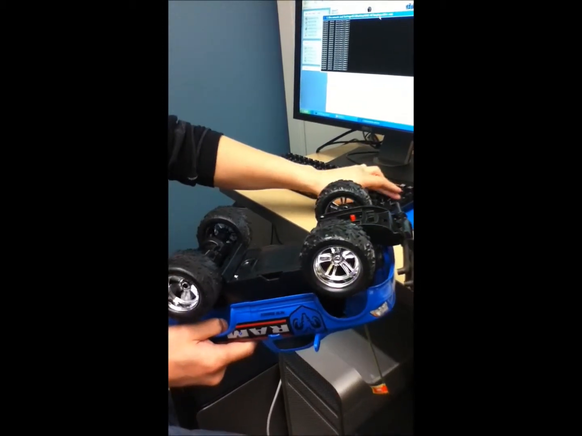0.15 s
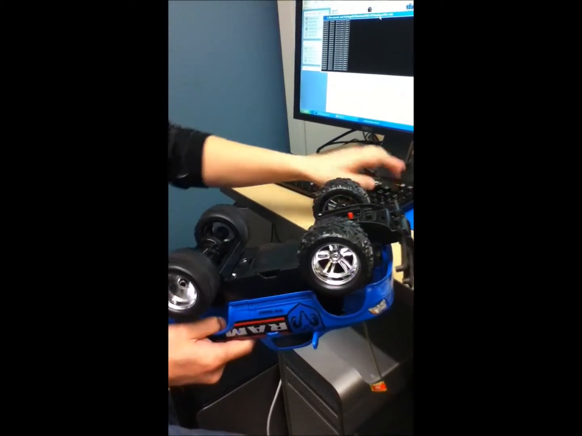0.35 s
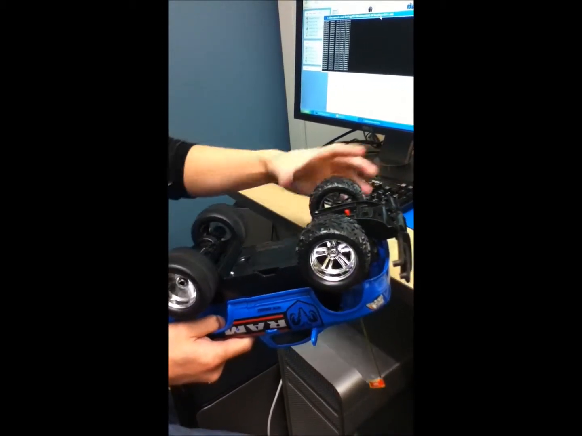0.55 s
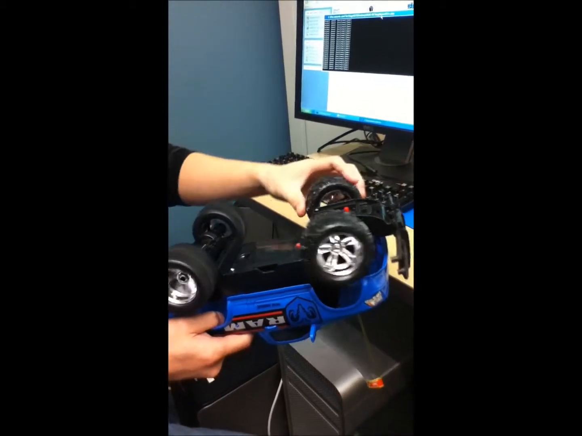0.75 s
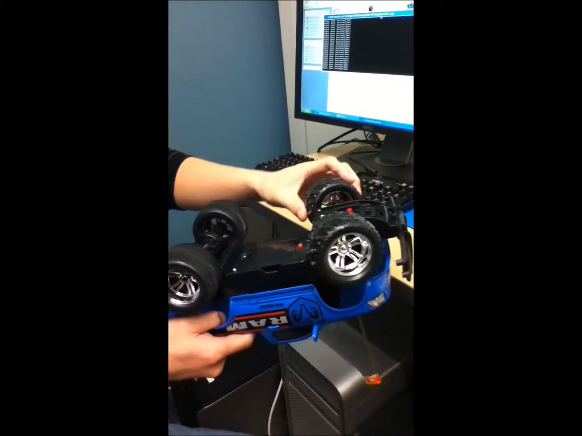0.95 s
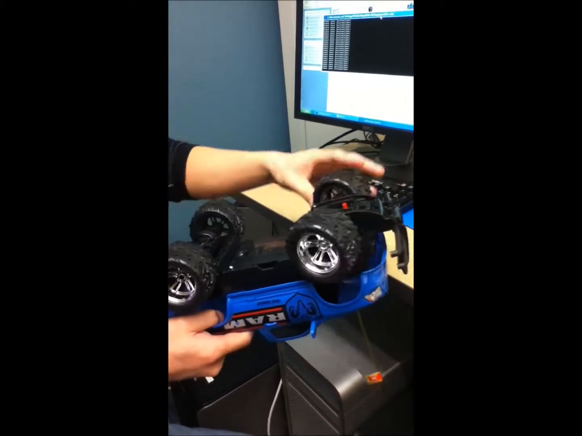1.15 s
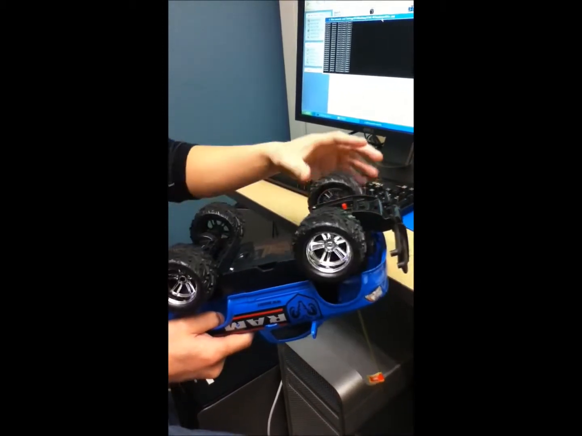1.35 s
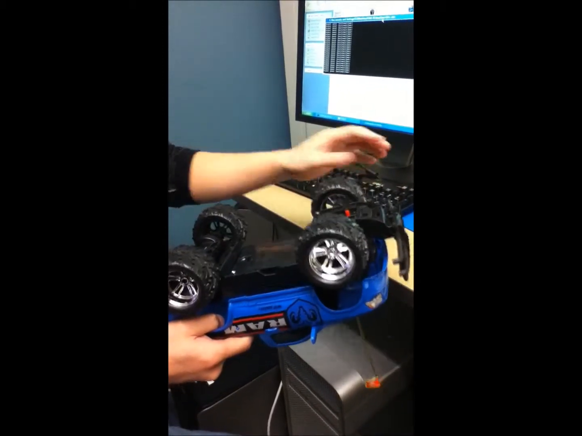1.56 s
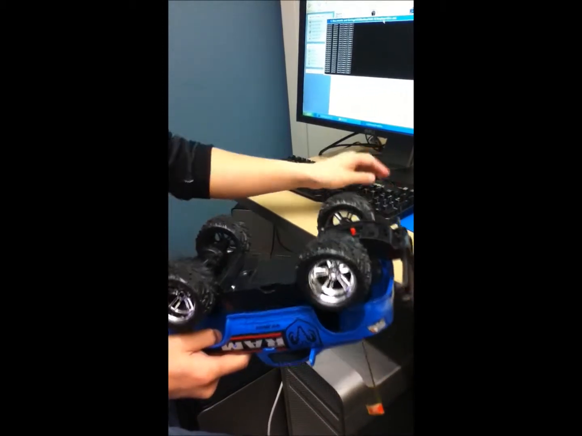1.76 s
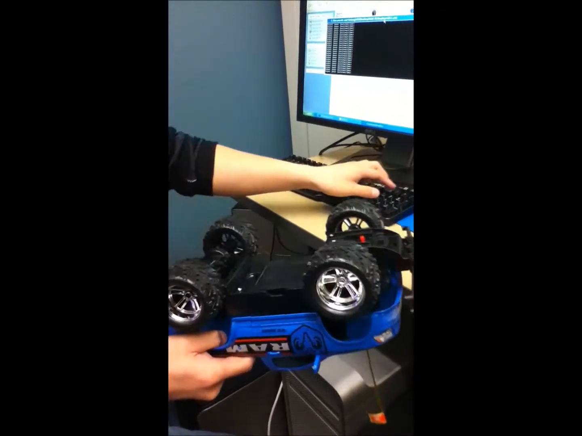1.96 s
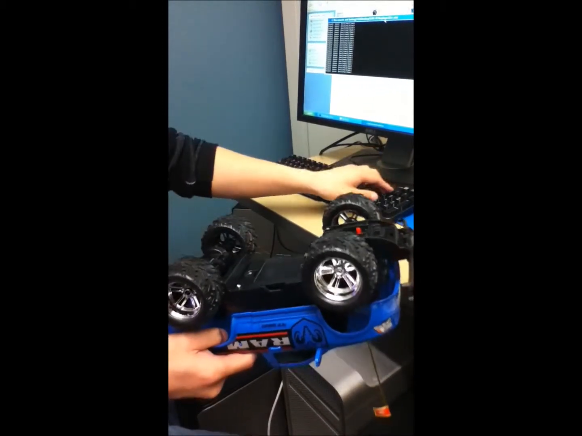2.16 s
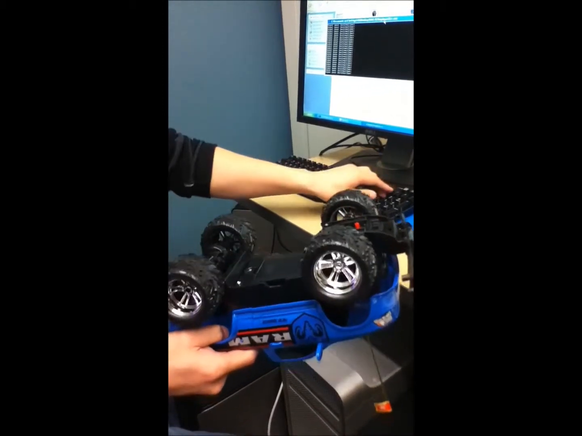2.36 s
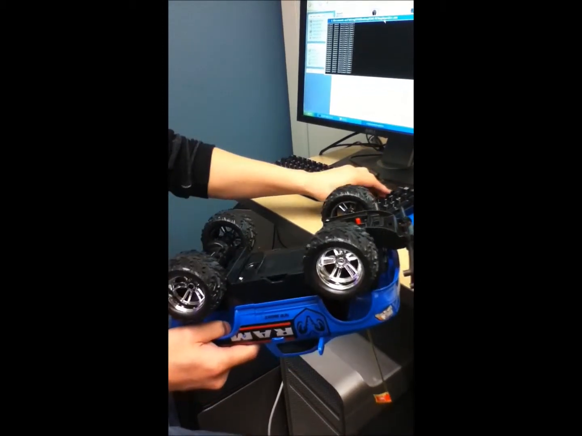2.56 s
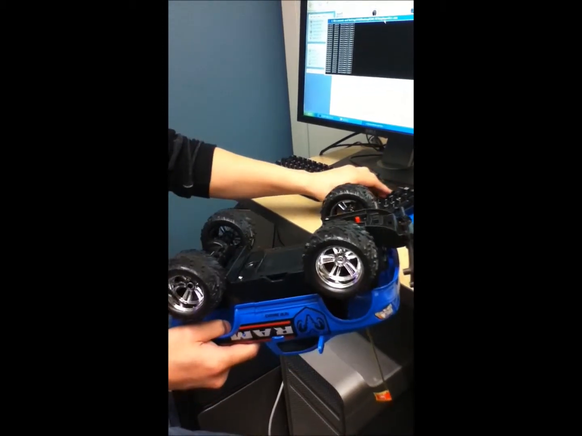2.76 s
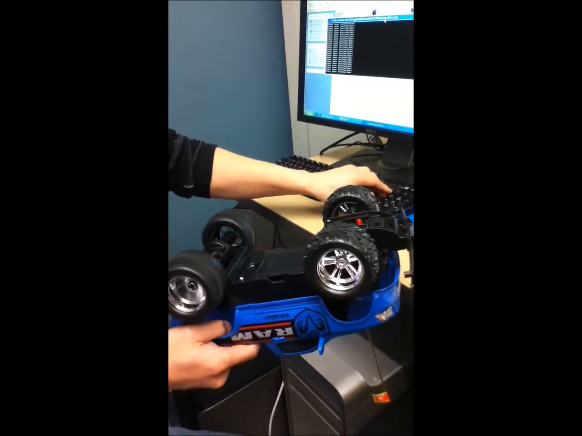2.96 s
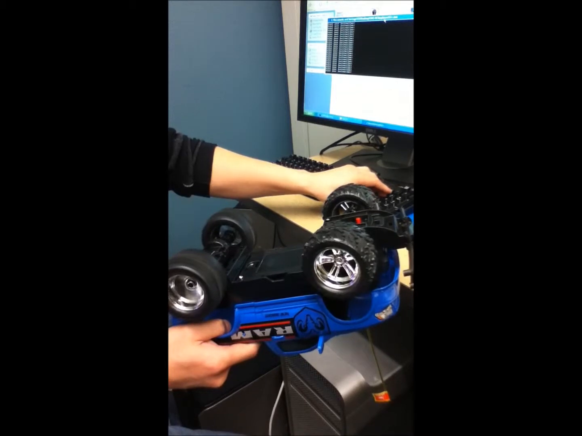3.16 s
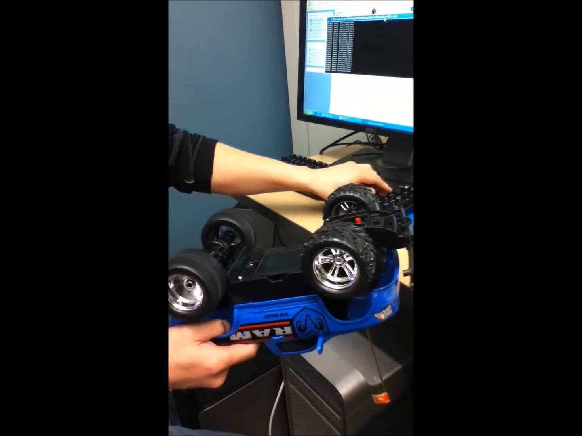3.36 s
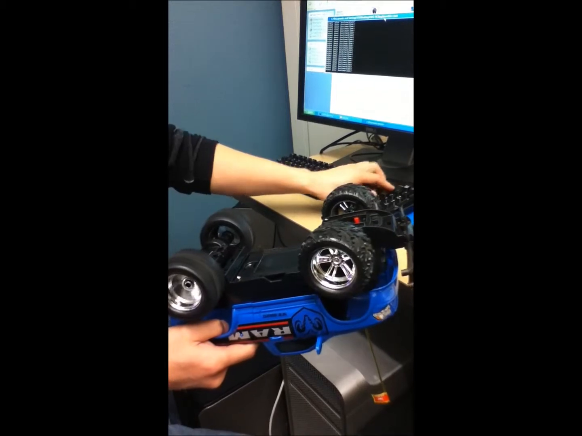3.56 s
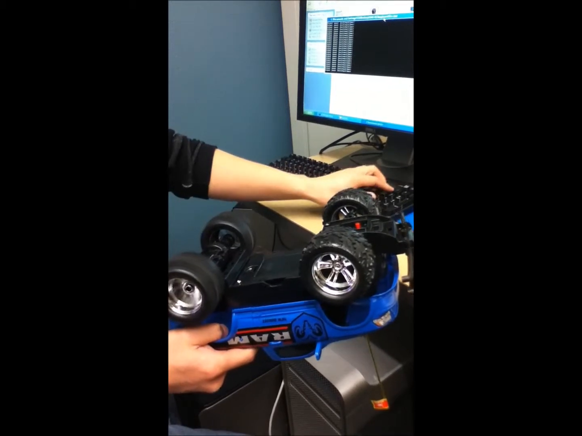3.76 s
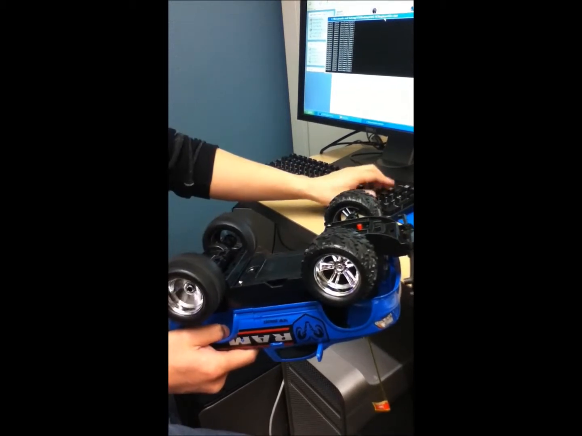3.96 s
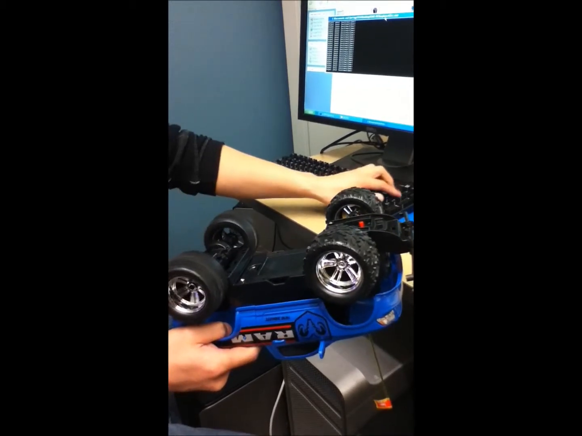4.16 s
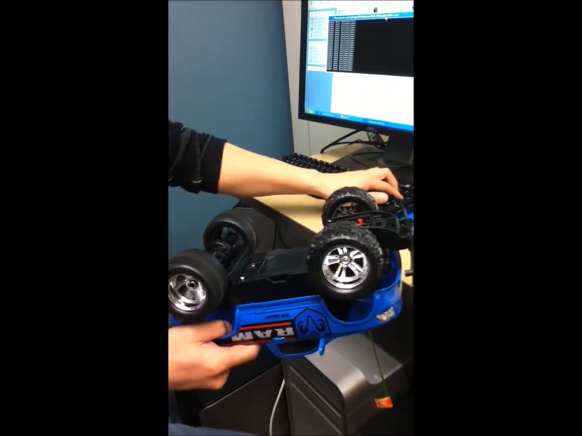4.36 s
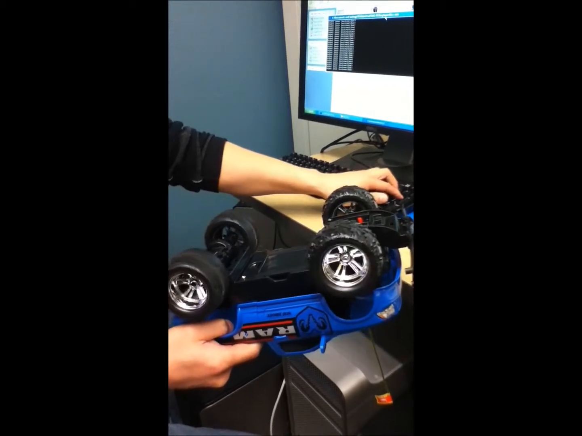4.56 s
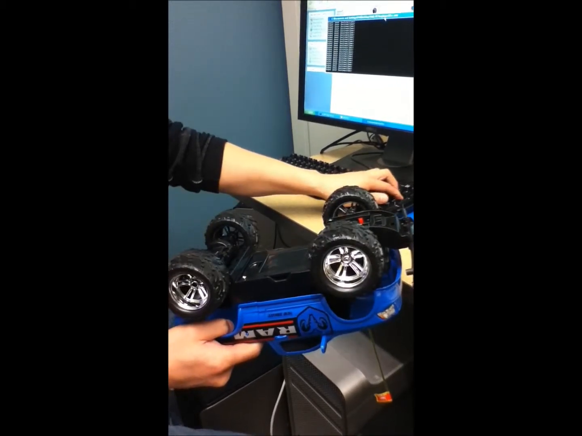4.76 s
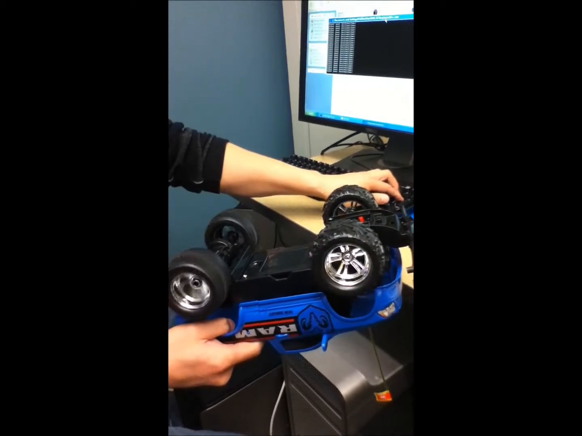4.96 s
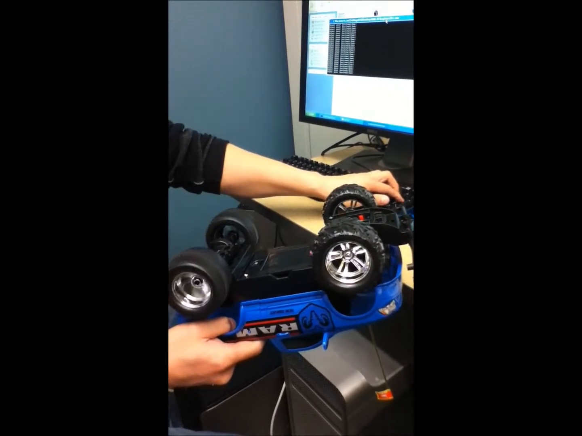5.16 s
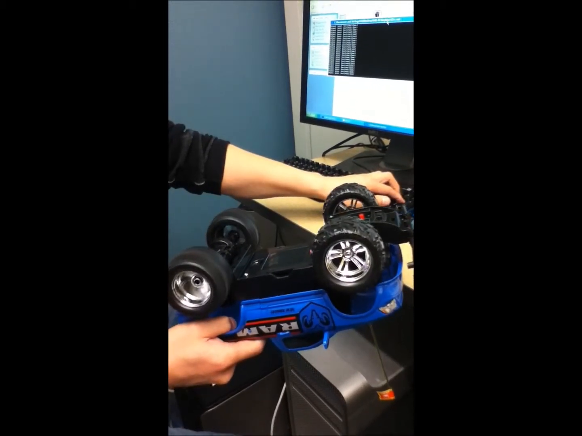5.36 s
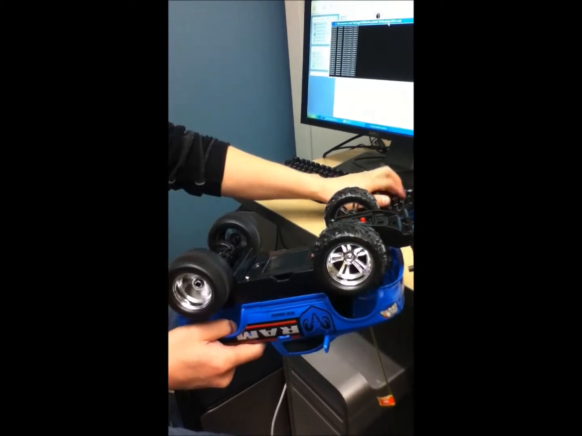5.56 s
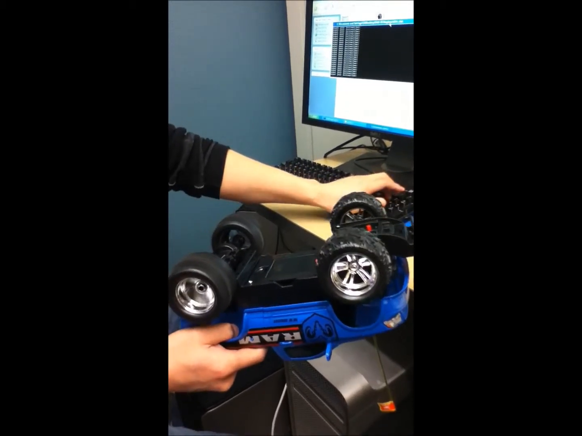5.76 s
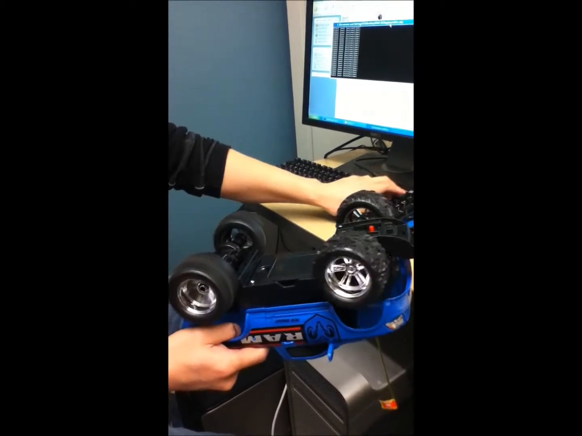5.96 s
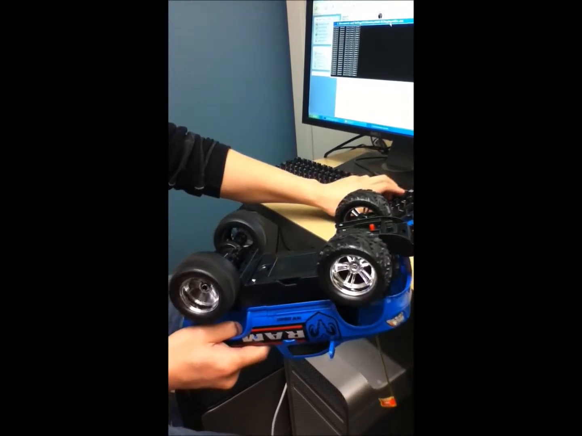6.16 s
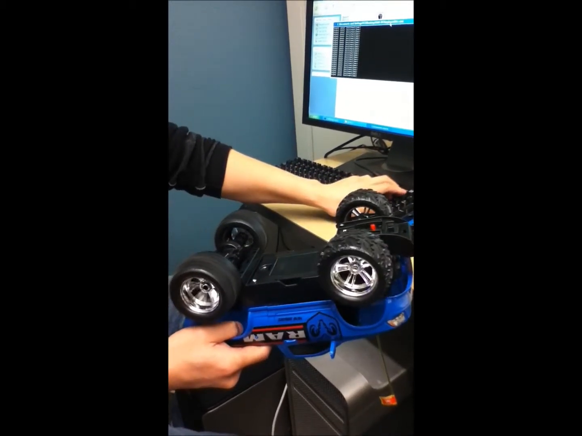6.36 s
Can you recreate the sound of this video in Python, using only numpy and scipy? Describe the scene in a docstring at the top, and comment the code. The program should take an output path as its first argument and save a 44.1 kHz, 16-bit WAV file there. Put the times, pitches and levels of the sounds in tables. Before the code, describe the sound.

Over low computer fan hum in a small room, a toy truck's electric motor is blipped six times close to the microphone. Each start clicks, then plastic gears chatter brightly with pulsing wheel knocks. Two bursts last about a second, others are brief; releases bring knocks and slowing ticks.

```python
"""A low room hum with a computer fan is heard first; then the electric motor of a toy truck, held upside down,
is blipped six times and left to coast. Each start takes up the gear slack with a click.
Plastic teeth chatter as trains of impulses, and loose axles modulate the chatter as the free wheels turn.
Motor bands growl, hum and whirr at multiples of the shaft rate; noise bursts make the knocks and taps.
The gears and clicks excite the resonances of the plastic chassis, and a short reverberation follows."""
import sys
import numpy as np
from scipy import signal
from scipy.fft import rfft, irfft
from scipy.io import wavfile
from scipy.ndimage import uniform_filter1d

SR = 44100
rng = np.random.default_rng(int(sys.argv[2]) if len(sys.argv) > 2 else 0)


def waveform_to_disk(signal):
    """Save audio, clipped to [-1, 1], as 16-bit WAV at the path in sys.argv[1]."""
    frames = np.transpose(np.atleast_2d(signal))
    scaled = np.clip(frames, -1, 1) * 32767
    samples = np.round(scaled).astype(np.int16)
    wavfile.write(sys.argv[1], SR, samples)


N = 286650
T = np.arange(N) / SR

# presses of the throttle: (start [s], held [s], coasting [s], top speed [Hz], relative level [dB],
# axle position [knocks], coasting knock rate [Hz], relative slack click level [dB], its relative treble [dB])
THROTTLE_PRESSES = [(0.242, 0.37, .6, 429.4, 0, 0.068, 18.6, -22, -22),
                    (2.359, .036, .065, 440.5, -0.5, 0.39, 37, -17.5, -10.5),
                    (2.859, 0.99, .52, 446.5, -0.5, 0.31, 23.2, -19, -14),
                    (4.377, 0.069, .32, 439.2, -1.5, 0.85, 20, -19, -13),
                    (4.932, .944, .7, 451.6, 0, 0.888, 21, -23, -30),
                    (6.453, 0.27, 0.63, 446, -2.5, 0.7, 15.2, -15, -14.5)]
# broad colour of the plastic chassis: (frequency [Hz], relative level [dB])
CHASSIS_COLOUR = [(250.0, -22), (500.0, -16.5), (700.0, -5), (1500.0, -7.5), (1750.0, -2), (2600.0, -0.5),
                  (4500.0, -6.5), (7000.0, -3), (10000.0, -6.5), (12000.0, -6.5), (13500.0, -17),
                  (15500.0, -21.5)]
# chassis resonances: (frequency [Hz], width [Hz], lift [dB])
CHASSIS_MODES = [(819, 30, 8), (936, 14, 4.5), (1214, 188, 10), (1451, 45, 5.5), (1697, 110, 6),
                 (1865, 284, 8), (2193, 187, 8.5), (2317, 103, 8), (2740, 400, 2.5), (2950, 595, 8),
                 (3430, 240, 4.5), (3812, 347, 9.5), (4250, 186, 1.5), (4407, 790, 10.5), (4870, 600, 1.5),
                 (5220, 720, 5), (5580, 150, 2.5), (6050, 230, 9.5), (6470, 310, 5.5), (7620, 340, 3.5),
                 (8830, 75, 3), (9480, 330, 5.5)]


def undb(db):
    """Amplitude gain is ten to the power of a twentieth of the level in decibels."""
    return 10 ** (np.asarray(db) / 20)


def unit(x):
    """Normalization: dividing by the root mean square gives unit power."""
    return x / np.sqrt(np.mean(x ** 2))


def walk(rate):
    """Band-limited random modulation: held random steps, smoothed, with a spread near 1."""
    step = max(int(SR / rate), 1)
    held = rng.standard_normal(N)[np.arange(N) // step]
    return unit(uniform_filter1d(held, step))


def colour(x, points, modes=()):
    """Minimum-phase filtering by a broad spectrum and resonant peaks; keeps the power of white noise."""
    hz = np.maximum(np.fft.rfftfreq(4096, 1 / SR), 1)
    points = np.array(points)
    db = np.interp(np.log(hz), np.log(points[:, 0]), points[:, 1])
    for centre, width, lift_db in modes:
        db = db + lift_db / (1 + (2 * (hz - centre) / width) ** 2)
    # folding the cepstrum onto positive times makes the response causal
    cepstrum = irfft(np.log(undb(db)))
    half = len(cepstrum) // 2
    cepstrum[1:half] *= 2
    cepstrum[half + 1:] = 0
    response = irfft(np.exp(rfft(cepstrum)))
    return signal.fftconvolve(x, response / np.linalg.norm(response))[:len(x)]


def split(x, hz):
    """Complementary filtering: the parts below and above a frequency sum to the whole."""
    low = signal.sosfiltfilt(signal.butter(2, hz, fs=SR, output="sos"), x)
    return low, x - low


def throttle():
    """Motor kinematics: speed rises toward its top while a press is held, then friction slows it evenly."""
    # the motor leaps to a share of its top speed, then closes in on the rest
    kick_s, kick_share, spin_up_s = .035, .511, .25
    # gear noise at top speed, its growth with speed, and the extra while the teeth pull hard
    drive_db, drive_db_per_octave, strain_db = -18.5, 7.5, 9.5
    strain_rise_s, strain_fade_s, release_s = 0.1, 0.24, 0.027
    # the treble grows with speed and strain, and is dull just after a start
    base_treble_db, treble_db_per_octave, strain_treble_db = 4, 4, 5.5
    dull_db, dull_s = -15.5, 0.06
    # driven axles knock once in so many motor turns, and stray from step the longer they spin
    turns_per_knock, stray_knocks_per_s = 12.04, 0.13
    # depth of the knocks: driven, extra after a start, coasting
    driven_flail_db, overshoot_db, coast_flail_db = 11.5, 11.5, 7
    # the knocks build up, and the first violent flailing settles
    flail_rise_s, flail_settle_s = 0.28, 0.14

    presses = np.array(THROTTLE_PRESSES)
    latest = np.maximum(np.searchsorted(presses[:, 0], T, side="right") - 1, 0)
    start, held, coasting, top_hz, press_db, axle, rock_hz, *_ = presses[latest].T
    age = np.maximum(T - start, 0)
    driven = np.minimum(age, held)
    released = np.maximum(age - held, 0)

    speed = np.minimum(driven / kick_s, 1) * (1 - (1 - kick_share) * np.exp(-driven / spin_up_s))
    speed = speed * np.maximum(1 - released / coasting, 0)
    octaves = np.log2(np.maximum(speed, 1e-6))  # relative to top speed
    power = np.maximum(1 - released / release_s, 0)
    strain = power * np.minimum(age / strain_rise_s, 1) * np.exp(-(age / strain_fade_s) ** 2)

    knocks = np.cumsum(top_hz * speed) / SR / turns_per_knock
    knocks = axle + knocks - np.interp(start, T, knocks) + stray_knocks_per_s * age * walk(14)
    extra_db = overshoot_db * np.exp(-age / flail_settle_s)
    flail_db = coast_flail_db + power * (driven_flail_db - coast_flail_db + extra_db)
    treble_db = base_treble_db + treble_db_per_octave * octaves + strain_treble_db * strain
    return dict(
        shaft_hz=top_hz * speed,
        coasting=(released > 0) & (speed > 0),
        level_db=drive_db + press_db + drive_db_per_octave * octaves + strain_db * strain,
        treble_db=treble_db + dull_db * np.exp(-age / dull_s),
        # once released, the axles rock at their own pace
        knocks=np.where(released > 0, released * rock_hz, knocks),
        flail_db=flail_db * np.minimum(age / flail_rise_s, 1))


def drivetrain(motor, flutter=.006, low_surge=0.61):
    """Source and resonator: gear and motor forces, louder and brighter when driven harder, ring the chassis."""
    shaft_hz = motor["shaft_hz"]
    turns = np.cumsum(shaft_hz * (1 + flutter * walk(60))) / SR
    level, bright = undb(motor["level_db"]), undb(motor["treble_db"])
    rest, high = split(gears(shaft_hz, turns) + whine(shaft_hz, turns), 2770)
    low, middle = split(rest, 1720)
    load = axle_load(motor["knocks"], motor["flail_db"])
    # hard knocks swell the upper range most; the low range runs on more evenly
    upper_force = shifting_contact((middle + bright * high) * load)
    low_force = (low + whirr(shaft_hz, turns)) * load ** low_surge
    force = (upper_force + low_force) * uniform_filter1d(level, SR // 200)
    return chassis(force) + shaft_hum(shaft_hz, turns)


def gears(shaft_hz, turns, count=12, size=48, scatter_db=3.0, tooth_db=1.0, rub_db=0,
          ring_s=0.0018, backlash_s=.00005, even_hz=380):
    """Gear meshing: a `count`-tooth pinion strikes a `size`-tooth spur gear; flanks scrape between the blows."""
    tooth = np.floor(turns * count).astype(int)
    hits = np.flatnonzero(np.diff(tooth))
    # each spur tooth has its own fit, and lands on its leading or trailing flank
    fit, flank = rng.standard_normal((size, 2))[tooth[hits] % size].T
    force, late = rng.standard_normal((N // 10, 2))[:len(hits)].T
    # slow gears catch and tick less evenly
    force = force * (2 - np.minimum(shaft_hz[hits] / even_hz, 1))
    # backlash lets a tooth land early or late, which blurs the high orders
    at = np.clip(hits + np.round(backlash_s * SR * late).astype(int), 0, N - 1)
    strength = undb(scatter_db * force + tooth_db * fit)
    blows = np.zeros(N)
    blows[at] = np.sign(flank) * strength / np.sqrt(shaft_hz[hits] + 20)
    blows /= np.sqrt(np.mean(blows[shaft_hz > 20] ** 2))
    fade = np.exp(-1 / (ring_s * SR))
    contact = signal.lfilter([1 - fade], [1, -fade], blows ** 2)
    scrape = np.sqrt(contact) * rng.standard_normal(N)
    return (blows + undb(rub_db) * scrape) / np.sqrt(1 + undb(rub_db) ** 2)


def rough_band(order, turns, rasp_hz):
    """Random modulation broadens one multiple of the shaft rate into a narrow band of noise."""
    envelope = walk(rasp_hz) + 1j * walk(rasp_hz)
    return np.real(envelope * np.exp(2j * np.pi * order * turns))


def whine(shaft_hz, turns, free_hz=400, slip_hz=110, whine_db=-13.0, rasp_hz=70):
    """Order excitation: the motor and spur gear growl in rough, rising bands while pulling up to speed."""
    # growl under load: (multiple of the shaft rate, relative level [dB])
    growl_orders = [(2, -4), (2.5, -9.5), (5.75, 0.5), (6.75, -2.5), (8.75, -4)]
    speeding_up = (np.gradient(shaft_hz) > 0) & (shaft_hz > free_hz / 2)
    pulling = uniform_filter1d(1. * speeding_up, SR // 40)
    # a DC motor's torque falls as it nears its free speed
    torque = pulling * np.clip((free_hz - shaft_hz) / slip_hz, 0, 1)
    tone = sum(undb(db) * rough_band(order, turns, rasp_hz) for order, db in growl_orders)
    return undb(whine_db) * torque * tone


def whirr(shaft_hz, turns, order=3, full_hz=430, whirr_db=-18, rasp_hz=330):
    """Pole-passing excitation: the three-pole rotor adds a broad, rough whirr that grows with speed squared."""
    return undb(whirr_db) * (shaft_hz / full_hz) ** 2 * rough_band(order, turns, rasp_hz)


def axle_load(knocks, flail_db, sharp=2.4, scatter=0.17):
    """Amplitude modulation: chatter surges at each axle knock, more deeply the harder the axles flail."""
    # no two neighbouring knocks are equally hard
    strength = 1 + scatter * rng.standard_normal(100)[np.round(knocks).astype(int) % 100]
    surge = np.abs(np.cos(np.pi * knocks)) ** (2 * sharp)
    swell = undb(flail_db * strength * surge)
    # the knocks bunch the power up without adding to it
    local_power = uniform_filter1d(uniform_filter1d(swell ** 2, SR // 10), SR // 15)
    return swell / np.sqrt(local_power)


def shifting_contact(force, rate=33, path_s=.0012, share=0.34):
    """Comb filtering: the contact point jumps, so a second path into the shell recolours the rattle."""
    spot = (T * rate).astype(int)
    lag = 4 + (path_s * SR * rng.random(N)[spot]).astype(int)
    flank = np.sign(rng.standard_normal(N))[spot]
    second_path = share * flank * force[np.maximum(np.arange(N) - lag, 0)]
    return (force + second_path) / np.sqrt(1 + share ** 2)


def chassis(force):
    """Modal resonance: a force on the gearbox rings the plastic shell."""
    return colour(force, CHASSIS_COLOUR, CHASSIS_MODES)


def shaft_hum(shaft_hz, turns, mode_hz=436, width_hz=32, hum_db=-43):
    """Forced resonance: the unbalanced rotor hums when its speed meets a resonance of the frame."""
    response = 1 / (1 + (2 * (shaft_hz - mode_hz) / width_hz) ** 2)
    return undb(hum_db + 2.8 * walk(25)) * response * np.sin(2 * np.pi * turns)


def contacts(table, rise_s, decay_s, gain_db, treble_db):
    """Transient excitation: each click is a noise burst, a quick cluster of small contacts that dies away."""
    force = np.zeros(N + SR)
    t = T[:SR // 20]
    shape = (1 - np.exp(-t / rise_s)) * np.exp(-t / decay_s)
    shape = shape / shape.max()
    for s, db, bright_db in table:
        low, high = split(rng.standard_normal(len(t)), 6600)
        i = int(s * SR)
        burst = low + undb(bright_db + treble_db) * high
        force[i:i + len(t)] += undb(db + gain_db) * shape * burst
    return force[:N]


def coasting_ticks(motor, count=150, slow_hz=230, above_db=7, scatter_db=1.5, treble_db=-10):
    """Random impacts: slack teeth tick as the wheels slow; rows (time [s], relative level [dB], treble [dB])."""
    at = ((np.arange(count) + rng.random(count)) * (N - 1) / count).astype(int)
    peak_db = motor["level_db"][at] + above_db + scatter_db * rng.standard_normal(count)
    loose = motor["coasting"][at] & (motor["shaft_hz"][at] < slow_hz)
    return [(s, db, treble_db) for s, db in zip(T[at[loose]], peak_db[loose])]


def drive_clicks(motor):
    """Impact excitation: gear slack, hard knocks and coasting ticks ring the shell and the gear teeth."""
    # hard knocks in the drive: (time [s], relative level [dB], relative treble [dB])
    hard_knocks = [(0.849, -15, 1), (1.016, -23, -12), (1.051, -33, -16), (2.37, -23, -10),
                   (2.418, -36, -8), (3.482, -5, -16), (3.561, -7, -6), (4.194, -19, -2), (4.397, -9.5, -5),
                   (4.44, -6.5, -28), (4.474, -7.5, -12), (4.546, -16.5, -10), (5.919, -0.5, -30),
                   (5.95, -5.5, -2)]
    # extra ring of the gear teeth: (frequency [Hz], width [Hz], lift [dB])
    tooth_modes = [(5040, 4300, 7.5), (7250, 1100, 2.5)]
    slack = [(start, click_db, treble_db) for start, *_, click_db, treble_db in THROTTLE_PRESSES]
    snaps = contacts(slack, rise_s=0.003, decay_s=0.0043, gain_db=-0.5, treble_db=13.5)
    knocks = contacts([*hard_knocks, *coasting_ticks(motor)],
                      rise_s=0.0036, decay_s=0.0031, gain_db=-6, treble_db=6.5)
    return colour(snaps + knocks, CHASSIS_COLOUR, [*CHASSIS_MODES, *tooth_modes])


def plastic_taps():
    """Filtered impacts: light taps on plastic as the wheels come to rest."""
    # taps: (time [s], relative level [dB], relative treble [dB])
    tap_times = [(1.147, -25, -5), (1.191, -27.5, -12), (1.204, -18.5, -2), (1.249, -29.5, -10),
                 (1.389, -26.5, -10), (1.424, -32.5, -14), (1.452, -37, -23), (2.688, -35, -16),
                 (4.766, -30.5, -16), (4.783, -32, -17)]
    # colour of the tapped plastic: (frequency [Hz], relative level [dB])
    tap_spectrum = [(300, -40), (750, 2), (1050, -1), (1400, 4), (2000, 1), (4000, -6), (6200, -10.5),
                    (7400, -0.5), (9000, -8), (15000, -24)]
    force = contacts(tap_times, rise_s=0.00061, decay_s=0.0078, gain_db=-7.5, treble_db=2)
    return colour(force, tap_spectrum)


def reverb(x, t60_s=0.24, wet_db=-15, dull_hz=7000):
    """Exponential decay of reflections: desk and near walls give a short, slightly dull tail."""
    t = T[:SR // 2]
    diffuse = split(rng.standard_normal(len(t)), dull_hz)[0]
    tail = diffuse * undb(-60 * t / t60_s) * (t > .003)
    return x + undb(wet_db) * signal.fftconvolve(x, tail / np.linalg.norm(tail))[:N]


def background(air_db=-39, hum_db=-3):
    """Stationary noise and tones: room rumble and fan hiss, with wavering hum lines."""
    # room noise: (frequency [Hz], relative level per hertz [dB])
    room_spectrum = [(15, -5.5), (27, 1.5), (42, -9), (65, -12.5), (120, -10), (155, -23), (205, -17.5),
                     (310, -22.5), (470, -27.5), (650, -35.5), (1900, -40.5), (4500, -41.5), (10000, -47),
                     (15500, -52)]
    # steady hum of the computer: (frequency [Hz], relative level [dB])
    fan_lines = [(26.9, -50.5), (209.9, -57.5), (258.4, -66), (333.8, -61)]
    hum = np.zeros(N)
    for hz, db in fan_lines:
        gain = undb(db + hum_db + 2 * walk(5)) * np.sqrt(2)
        hum += gain * np.sin(2 * np.pi * hz * T + 0.61 * walk(2.46))
    return unit(colour(rng.standard_normal(N), room_spectrum)) * undb(air_db) + hum


def scene():
    """Superposition: the truck's sounds excite the room, and the background adds to them."""
    motor = throttle()
    truck = drivetrain(motor) + drive_clicks(motor) + plastic_taps()
    return (reverb(truck) + background())[None]


def record(dry):
    """Soft saturation rounds the highest peaks; a steep elliptic low-pass cuts the top."""
    top_hz = 15900
    low_pass = signal.ellip(8, .2, 70, top_hz, fs=SR, output="sos")
    return signal.sosfilt(low_pass, np.tanh(dry))


dry = scene()
out = record(dry)
waveform_to_disk(out)
```